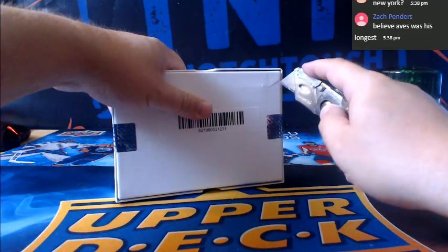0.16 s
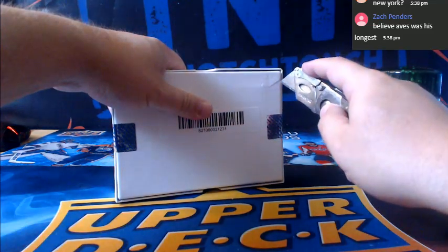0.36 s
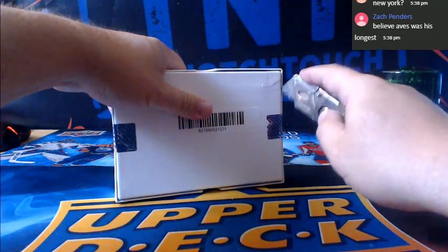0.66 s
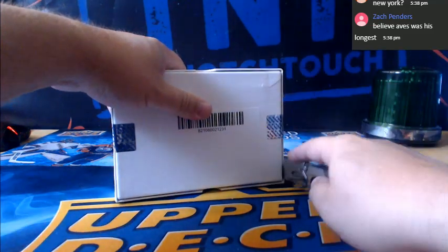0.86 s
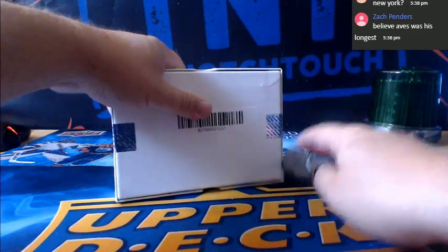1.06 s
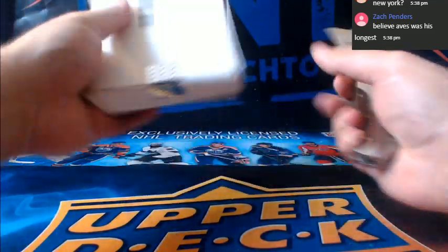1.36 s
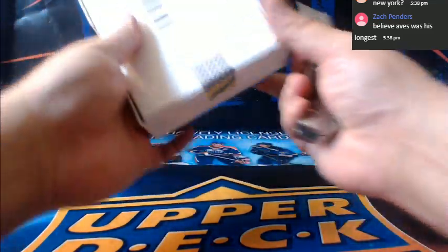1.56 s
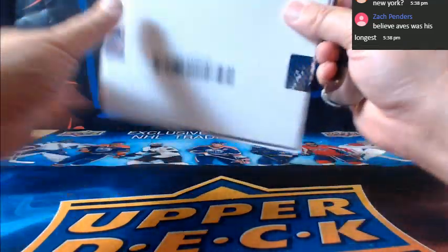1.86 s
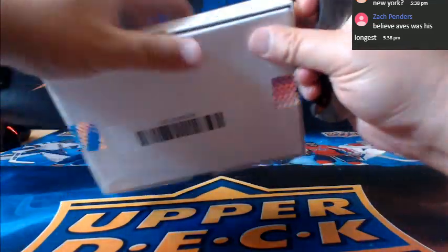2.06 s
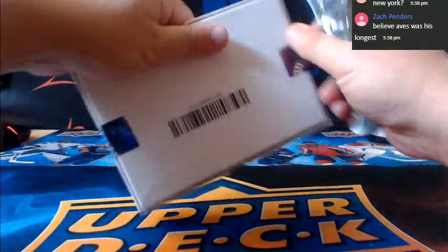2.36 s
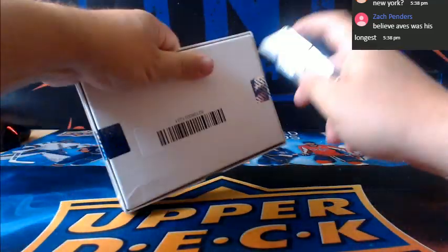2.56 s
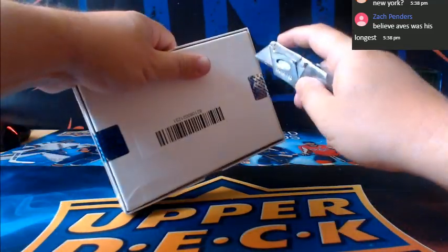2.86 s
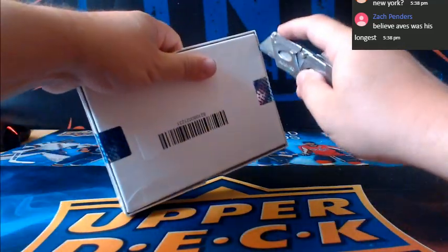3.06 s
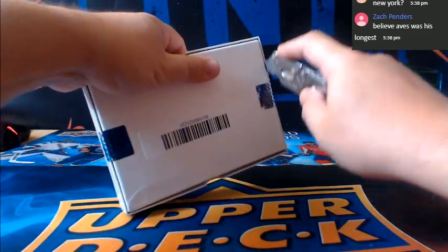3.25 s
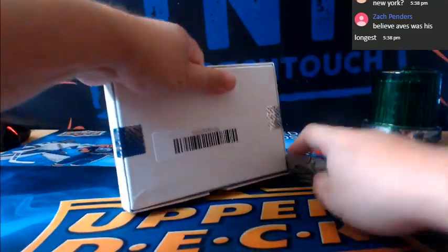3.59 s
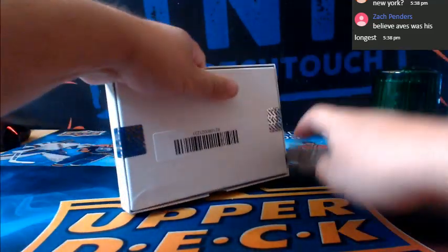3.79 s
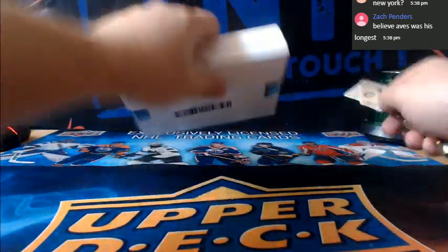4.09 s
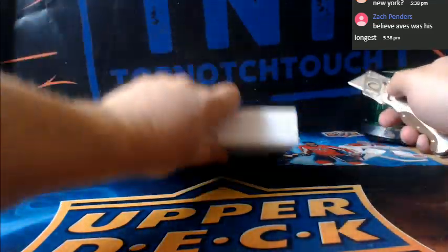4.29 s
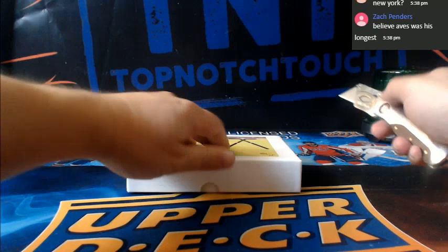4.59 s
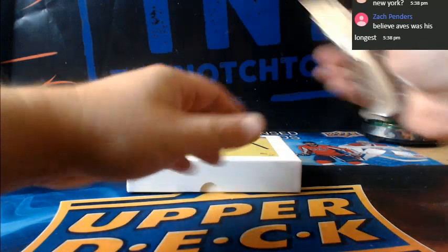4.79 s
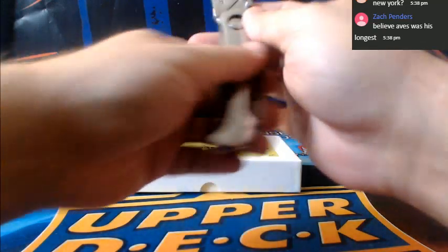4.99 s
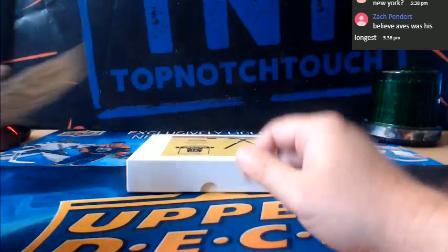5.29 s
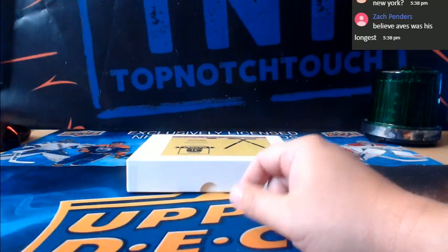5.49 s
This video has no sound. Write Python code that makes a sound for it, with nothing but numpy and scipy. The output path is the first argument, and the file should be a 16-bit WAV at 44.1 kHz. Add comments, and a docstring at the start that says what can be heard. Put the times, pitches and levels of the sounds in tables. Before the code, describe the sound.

In a small, humming room, a utility knife scrapes and snaps through the tape seal of a cardboard box, which thumps the table. Fingers rub and squeak softly as the box is turned, with faint metal clicks. A second seal is scraped and snaps. The box is laid flat with two hollow knocks, and the knife is put down with a loud clack close to the microphone.

```python
"""A folding utility knife slits the two tape seals of a small cardboard box on a mat-covered table.
The blade scrapes, the tight tape snaps, and after each cut the box thumps the table. Between the cuts
the box is turned in rubbing, squeaking fingers; afterwards it is laid flat. The steel knife clicks in
the hand and is put down hard near the microphone, in a small humming room."""
import sys
import numpy as np
from scipy import signal
from scipy.fft import rfft, irfft, next_fast_len
from scipy.io import wavfile
from scipy.ndimage import map_coordinates

SR = 44100
rng = np.random.default_rng(int(sys.argv[2]) if len(sys.argv) > 2 else 0)


def log_audio(samples):
    """Write samples as a 16-bit WAV file to the path given in sys.argv[1]."""
    # one column per channel
    frames = np.atleast_2d(samples).T
    # limit to full scale, then quantise
    limited = np.clip(frames, -1, 1)
    pcm = np.round(limited * 32767).astype(np.int16)
    wavfile.write(sys.argv[1], SR, pcm)


N = 248591


def amp(db):
    return 10 ** (np.asarray(db) / 20)


def unit(x):
    return x / np.sqrt(np.mean(x ** 2) + 1e-20)


def along(points, hz):
    """Read a curve of (Hz, value) points at any pitch."""
    f, v = np.transpose(points)
    return np.interp(np.log(hz + 1), np.log(f + 1), v)


def fade(t, t60):
    """Die away by 60 dB in t60 seconds, the fade time."""
    return np.exp(-np.log(1000) * t / t60)


def wobble(rate):
    """A smooth curve through `rate` random points a second."""
    return map_coordinates(rng.standard_normal(int(N * rate / SR) + 4), [np.arange(N) * rate / SR])


def add(track, s, sound):
    """Mix a sound into the track from s seconds on."""
    part = track[round(s * SR):][:len(sound)]
    part += sound[:len(part)]


def coloured(x, spectrum):
    """Give noise a tone colour, at a strength of 1."""
    size = next_fast_len(N + 8192)
    gain = amp(along(spectrum, np.fft.rfftfreq(size, 1 / SR)))
    return unit(irfft(rfft(x, size) * gain, size)[:N])


def impulse(spectrum, tilt_db, size=4096):
    """One pulse, brightened by tilt_db per octave; in a bending sheet its high notes arrive first."""
    hz = np.fft.rfftfreq(size, 1 / SR)
    gain = amp(along(spectrum, hz) + tilt_db * np.log2(1 + hz / 500))
    cepstrum = irfft(np.log(np.maximum(gain / gain.max(), 1e-4)))
    one_sided = np.r_[cepstrum[0], 2 * cepstrum[1:size // 2]]  # no sound before the hit
    phase_lag = np.sqrt(hz / 16)
    return irfft(np.exp(rfft(one_sided, size) - 1j * phase_lag))


def contact(spectrum, tilt_db, t60, chatter, crunch):
    """One hit: a push, a brief crunch, then a dying chatter."""
    t = np.arange(SR // 2) / SR
    noise = rng.standard_normal((2, len(t))) * [fade(t, t60), t * fade(t, 0.0038)]
    force = np.dot([chatter, crunch], noise / np.linalg.norm(noise, axis=1, keepdims=True))
    force[0] += 1
    hit = signal.fftconvolve(force, impulse(spectrum, tilt_db))[:len(t)]
    return hit / np.linalg.norm(hit) * np.sqrt(.003 * SR)  # the energy of 3 ms at strength 1


def ring(notes):
    """A struck object's notes swell quickly and fade, at slightly new strengths each time."""
    t = np.arange(SR // 2) / SR
    rise = 1 - np.exp(-t / 0.0017)
    return rise * sum(amp(db + rng.standard_normal()) * np.sin(2 * np.pi * hz * t) * fade(t, t60)
                      for hz, db, t60 in notes)


def friction(rate, smooth):
    """Tiny random catches, `rate` a second, over a smooth slide."""
    catches = (rng.random(N) < rate / SR) * rng.standard_normal(N)
    return unit(catches) + smooth * rng.standard_normal(N)


def stroke(start, end):
    """A movement speeds up and slows down."""
    progress = np.clip((np.arange(N) / SR - start) / (end - start), 0, 1)
    return np.abs(np.sin(np.pi * progress)) ** .75


# The tone of a small, stiff contact. Each row: multiple of its centre pitch, level in dB.
PEAK_SHAPE = [(.1, -39), (.3, -6.5), (.6, -5), (.85, -1), (1, 3), (1.25, -2.5), (1.7, -5), (3, -11)]
def peak(centre_hz, focus):
    """A tone colour strongest around one pitch; more focus narrows it."""
    return [(ratio * centre_hz, focus * db) for ratio, db in PEAK_SHAPE]


# The room's echo. Each row: pitch in Hz, fade time in seconds.
ECHO_TIMES = [(100, 0.47), (500, 0.26), (1200, 0.28), (3000, 0.26), (8000, 0.21), (15000, 0.13)]
def in_room(x, echo_db):
    """Add an echo whose high notes die first."""
    hz, t, noise = signal.stft(rng.standard_normal(SR // 2), SR, nperseg=256)
    tail = signal.istft(noise * fade(t, along(ECHO_TIMES, hz)[:, None]), SR, nperseg=256)[1]
    tail *= 1 - np.exp(-np.arange(len(tail)) / SR / 0.00096)  # the walls answer a moment later
    return x + amp(echo_db) * signal.fftconvolve(x, tail / np.linalg.norm(tail))[:len(x)]


def blows(rows, spectrum, t60, chatter, crunch, echo_db):
    """Several hits on one object, heard in the room."""
    out = np.zeros(N)
    for s, db, tilt_db in rows:
        add(out, s, in_room(amp(db) * contact(spectrum, tilt_db, t60, chatter, crunch), echo_db))
    return out


# The room's steady noise. Each row: pitch in Hz, relative level in dB.
ROOM_TONE = [(5, -7), (12, 4.5), (24, -17.5), (36, -12), (55, -26.5), (80, -24), (140, -26), (190, -36.5),
             (380, -39), (620, -48.5), (980, -44), (1800, -53.5), (2700, -60.5), (6000, -61.5),
             (16000, -64.5)]
def background():
    """A deep, uneven rumble with fan noise and faint hiss."""
    return amp(-40.0) * coloured(rng.standard_normal(N), ROOM_TONE)


# The steel's notes. Each row: pitch in Hz, relative level in dB, fade time in seconds.
STEEL_NOTES = [(4075, 7.5, 0.082), (4700, -4, 0.13), (4500, -10, 0.11), (6150, 7.5, 0.1), (7300, -19, 0.12),
               (8500, -9, 0.11), (9900, -4, .14), (11500, 4, 0.17), (13530, -11, .06)]
# The knife's clicks. Each row: start in seconds, relative level in dB, centre pitch in Hz.
KNIFE_CLICKS = [(1.419, -50.5, 6000), (2.391, -60, 9000), (2.4721, -39.5, 8900), (2.4737, -54.5, 5100),
                (2.883, -54, 12000), (4.4745, -52, 10000), (4.5808, -47, 7800), (4.584, -48, 4200),
                (4.592, -50.5, 4570)]
def knife_clicks(count=8, gap_s=.5):
    """Loose steel parts click in the hand; the notes nearest a click's pitch ring most."""
    faint_ticks = [((k + when) * gap_s, -66 + 3 * (2 * size - 1), 8000)
                   for k, (when, size) in enumerate(rng.random((count, 2)))]
    grip_detune = 0.01213  # the grip shifts each note by about this share
    out = np.zeros(N)
    for s, db, centre_hz in KNIFE_CLICKS + faint_ticks:
        colour = peak(centre_hz, focus=1.46)
        notes = [(hz * (1 + grip_detune * rng.standard_normal()), level + along(colour, hz), t60)
                 for hz, level, t60 in STEEL_NOTES]
        click = contact(colour, 0, t60=0.072, chatter=3.8, crunch=5.2) + amp(-16.5) * ring(notes)
        add(out, s, in_room(amp(db + 2.5) * click, echo_db=-8))
    return out


# Rubbed cardboard. Each row: pitch in Hz, relative level in dB.
RASP_TONE = [(200, -4.5), (400, -3), (750, 3), (1250, -0.5), (2200, -14), (4000, -41), (10000, -45)]
# Hand strokes; the last row is a short, rough knock as the box is laid flat.
# Each row: start and end in seconds, rasp and hiss levels in dB, hiss pitch in Hz.
HANDLING = [(1.035, 1.091, -54, -61.5, 5540), (1.162, 1.287, -54.5, -56, 3450),
            (1.303, 1.384, -48.5, -47.5, 4740), (1.453, 1.52, -58.5, -54.5, 4900),
            (1.606, 1.663, -66, -56.5, 12200), (1.63, 1.934, -58, -71.5, 6060),
            (1.944, 1.984, -55.5, -63, 7000), (1.995, 2.103, -53.5, -62, 6860),
            (2.087, 2.176, -73, -64.5, 6000), (3.61, 3.718, -64, -64, 8060),
            (3.905, 4.017, -57.5, -61.5, 5170), (4.263, 4.354, -67, -62, 5900),
            (4.318, 4.356, -43, -53, 1740)]
def handling():
    """A low rasp and a hiss swell as skin rubs the box, and in a rough knock as it is laid flat."""
    swell = sum(amp(db) * stroke(start, end) for start, end, db, _, _ in HANDLING)
    rasp = swell * coloured(friction(rate=390, smooth=0.83), RASP_TONE)
    catches = friction(rate=1300, smooth=0.92)
    hiss = sum(amp(db) * stroke(start, end) * coloured(catches, peak(hz, focus=1.07))
               for start, end, _, db, hz in HANDLING)
    return in_room((rasp + hiss) * amp(2.4 * wobble(70)), echo_db=-6.5)


# Squeaks. Each row: start and end in seconds, first and last pitch in Hz, level in dB.
FINGER_SQUEAKS = [(1.172, 1.23, 427, 400, -49), (1.282, 1.36, 620, 764, -42), (2.014, 2.078, 888, 610, -52),
                  (2.046, 2.107, 374, 453, -52), (3.931, 3.971, 804, 723, -51.5)]
def squeaking(card_hz=4430):
    """A finger sticks and slips on the glossy lid; the harder it presses, the more the card buzzes."""
    out = np.zeros(N)
    waver = 1 + 0.015 * wobble(250)
    uneven = amp(3 * wobble(700))
    loudest = max(row[-1] for row in FINGER_SQUEAKS)
    for start, end, first_hz, last_hz, db in FINGER_SQUEAKS:
        hz = np.interp(np.arange(N) / SR, [start, end], [first_hz, last_hz]) * waver
        cycles = np.cumsum(hz) / SR
        tone = np.sin(2 * np.pi * cycles) + 0.1 * np.sin(4 * np.pi * cycles)
        slips = np.diff(cycles % 1, prepend=0) * uneven  # one slip per cycle
        buzz = amp(db - loudest - 7.5) * coloured(slips, peak(card_hz, focus=2.6))
        out += amp(db) * stroke(start, end) * (tone + buzz)
    return in_room(out, echo_db=-7.5)


# The table top's notes. Each row: pitch in Hz, relative level in dB, fade time in seconds.
TABLE_NOTES = [(80.3, -12, 0.39), (135, 1, 0.16), (151.4, -9.5, 0.29), (226.4, -7.5, 0.21), (267, -18, .22),
               (355.4, -7, 0.16), (500.4, -15, 0.11), (623, -19, 0.097), (635, -7.5, 0.077)]
def table_booms(rows):
    """The table top booms; a harder push brings out its higher notes."""
    out = np.zeros(N)
    for s, db, hard_db in rows:
        notes = [(hz, level + hard_db * np.log2(hz / 133), t60) for hz, level, t60 in TABLE_NOTES]
        add(out, s, in_room(amp(db + 4) * ring(notes), echo_db=-17.5))
    return out


# Knocked cardboard. Each row: pitch in Hz, relative level in dB.
BOX_TONE = [(90, -12.5), (200, 1.5), (350, 6.5), (470, -6), (600, 4.5), (800, -6.5), (1080, 0.5),
            (1400, -24.5), (1780, -8.5), (2050, -15), (2400, -23), (3200, -23.5), (4800, -30), (16000, -58)]
def box_knocks(rows):
    """Short knocks on the hollow box."""
    return blows(rows, BOX_TONE, t60=0.04, chatter=1.0, crunch=0.95, echo_db=-6)


# Fingers and box edges tap. Each row: start in seconds, level in dB, brightness in dB per octave.
LIGHT_TAPS = [(1.047, -46, 8), (1.079, -54, -1), (1.181, -43, 4.5), (2.0112, -41.5, -0.5),
              (3.6555, -51, 8.5), (4.1288, -30, 2.5), (4.32, -37.5, 0)]
# The box meets the table. Each row: start in seconds, then relative level in dB and brightness
# in dB per octave, first for the knock and then for the boom.
BOX_BUMPS = [(1.417, -45.5, 0, -50.5, -1), (2.39, -50.5, 0.5, -46.5, -2.5), (2.4723, -40.5, 5.5, -53, -8),
             (4.1332, -23.5, 1, -38, 4.5), (4.341, -28.5, 1, -27.5, -4.5)]
def box_moves():
    """Light taps sound only the box; a bump sounds the table too."""
    knocks = box_knocks(LIGHT_TAPS + [(s, db, tilt_db) for s, db, tilt_db, _, _ in BOX_BUMPS])
    return knocks + table_booms([(s, db, hard_db) for s, _, _, db, hard_db in BOX_BUMPS])


# The handle's notes. Each row: pitch in Hz, relative level in dB, fade time in seconds.
HANDLE_NOTES = [(994, -5, 0.18), (1131, 3, 0.12), (1238, 5.5, 0.12), (1340, -5, .18), (1388, 1, .16),
                (1530, -15, 0.14), (1696, -3, 0.12), (1990, 1, 0.086), (3080, -5, 0.045),
                (4040, -27, 0.065), (5470, -26, .09), (5950, -13, 0.13)]
# The knife's clack. Each row: pitch in Hz, relative level in dB.
CLACK_TONE = [(90, -20), (200, -2.5), (400, -1.5), (750, -2.5), (900, -3.5), (1220, -0.5), (1550, -2.5),
              (2000, -4), (2500, -15.5), (3100, -8.5), (3550, -16), (4400, -13.5), (6200, -19), (7500, -26),
              (16000, -31)]
# Each end lands, then rattles. Each row: start in seconds, level in dB, brightness in dB per octave.
KNIFE_HITS = [(5.5672, -14, -4), (5.57, -23, 4), (5.6036, -9.5, 2), (5.62, -28, -1.5)]
def knife_landing(hard_db=11):
    """The knife clacks down and its hollow handle rings; duller hits make the table boom more."""
    rings = np.zeros(N)
    for s, db, tilt_db in KNIFE_HITS:
        add(rings, s, amp(db + tilt_db - 16) * ring(HANDLE_NOTES))
    booms = table_booms([(s, db - tilt_db - 32.5, hard_db) for s, db, tilt_db in KNIFE_HITS])
    clacks = blows(KNIFE_HITS, CLACK_TONE, t60=0.061, chatter=0.88, crunch=1.2, echo_db=-9)
    return rings + booms + clacks


# Tearing tape. Each row: pitch in Hz, relative level in dB.
TAPE_TONE = [(180, -32), (300, -13), (385, -1.5), (555, -17), (801, -0.5), (1530, -10.5), (1900, -7.5),
             (2650, -13), (4090, -13), (11900, -15), (16000, -22.5)]
# Strokes of the blade. Each row: start and end in seconds, level in dB.
BLADE_STROKES = [(0.512, 0.61, -56), (0.622, 0.686, -54.5), (2.996, 3.236, -67), (3.194, 3.252, -57),
                 (3.262, 3.278, -48.5), (3.308, 3.454, -53)]
def cutting():
    """The blade tears fibre after fibre, and the cardboard rasps beneath it."""
    drag = sum(amp(db) * stroke(start, end) for start, end, db in BLADE_STROKES)
    grip = amp(2.5 * wobble(90))
    scrape = coloured(friction(rate=590, smooth=0.55), TAPE_TONE)
    rasp = amp(-3) * coloured(friction(rate=300, smooth=0.71), RASP_TONE)
    return in_room(drag * grip * (scrape + rasp), echo_db=-0.5)


# The blade snags in the tape. Each row: start in seconds, level in dB, brightness in dB per octave.
BLADE_SNAGS = [(3.1098, -47.5, 8.5), (3.2213, -58, 3), (3.2618, -54.5, 4), (3.3076, -35.5, -1.5)]
# The two seals. Each row: time in seconds and level in dB of the piercing, the same for the parting,
# brightness in dB per octave.
TAPE_SEALS = [(0.6601, -26.5, .694, -25, 0), (3.3634, -25.5, 3.4065, -31, 0)]
def seals_snapping():
    """Tight tape snaps as it is pierced and again as it parts; the freed box thumps the table."""
    snaps, jolts, thumps = list(BLADE_SNAGS), [], []
    for pierce_s, pierce_db, part_s, part_db, tilt_db in TAPE_SEALS:
        # a weaker snap follows each one, and the box is jolted
        snaps += [(pierce_s, pierce_db, tilt_db), (pierce_s + 0.0084, pierce_db - 16, tilt_db),
                  (part_s, part_db, tilt_db), (part_s + 0.0076, part_db - 5.5, tilt_db)]
        jolts += [(pierce_s, pierce_db - 8, 3), (part_s, part_db - 6, 4.5)]
        thumps += [(part_s, part_db + 2.5, -4)]
    tape = blows(snaps, TAPE_TONE, t60=0.064, chatter=6.6, crunch=8.9, echo_db=-4.5)
    return tape + box_knocks(jolts) + table_booms(thumps)


def scene():
    """All the sounds together, in one channel."""
    box = cutting() + seals_snapping() + box_moves() + handling() + squeaking()
    return (box + knife_clicks() + knife_landing() + background())[None]


def record(dry, top_hz=16100):
    """The microphone loses the very highest sounds."""
    return signal.fftconvolve(dry, signal.firwin(255, top_hz, fs=SR)[None], mode="same", axes=1)


dry = scene()
out = record(dry)
log_audio(out)
```